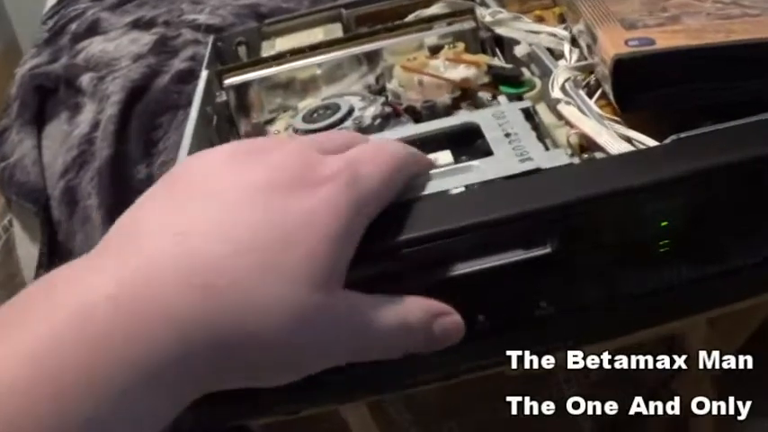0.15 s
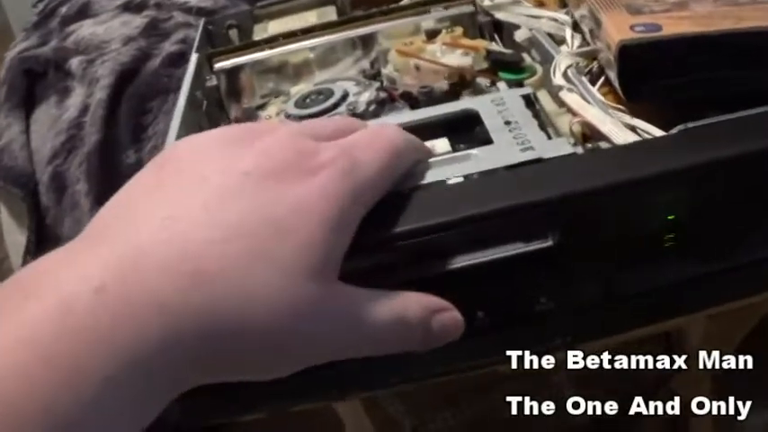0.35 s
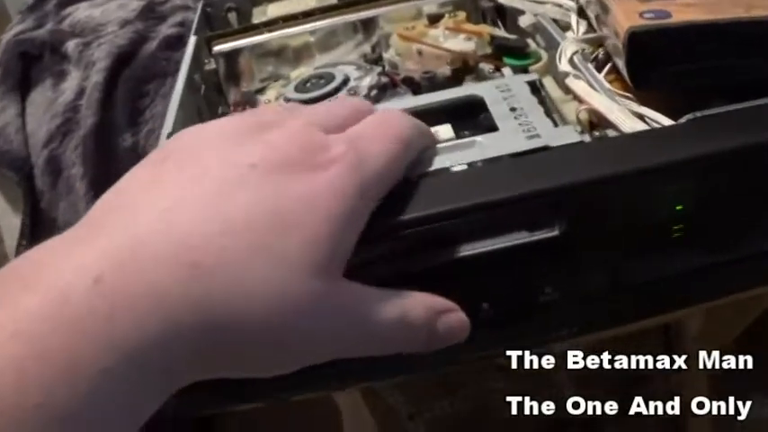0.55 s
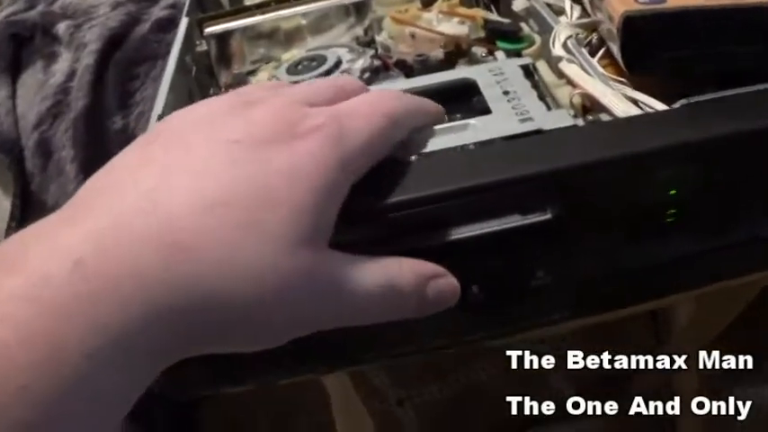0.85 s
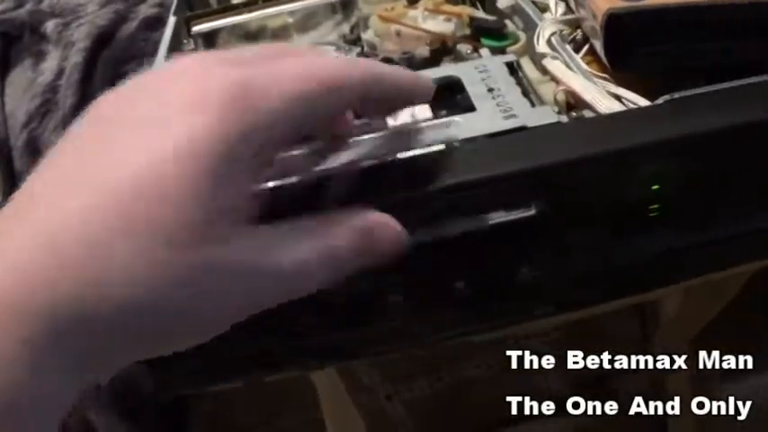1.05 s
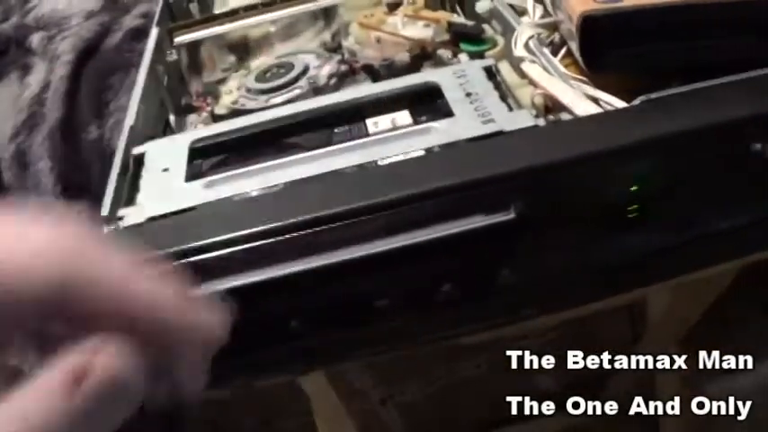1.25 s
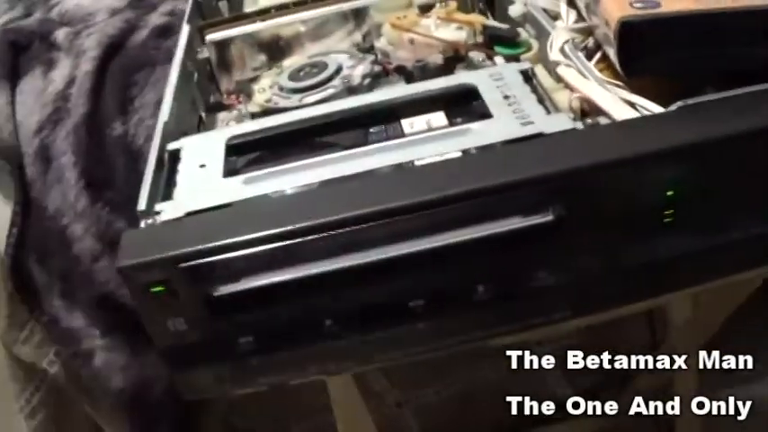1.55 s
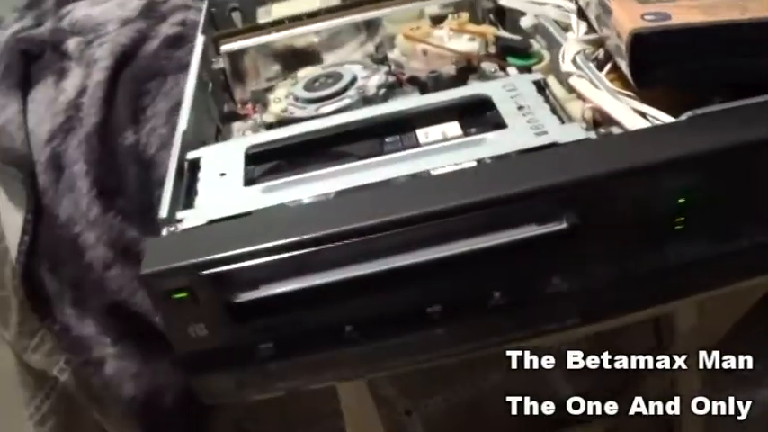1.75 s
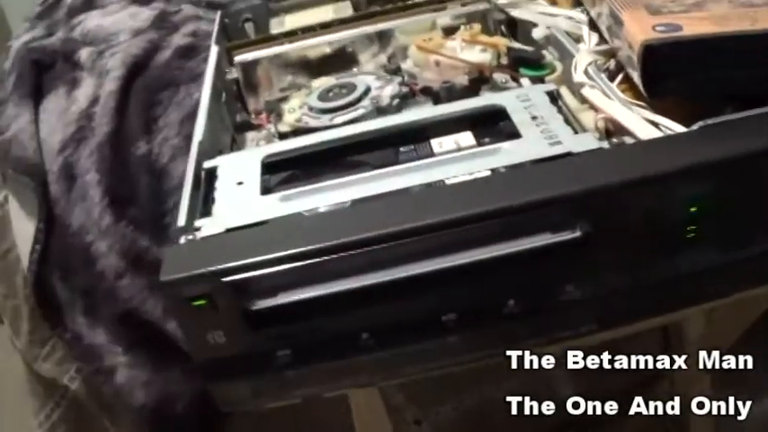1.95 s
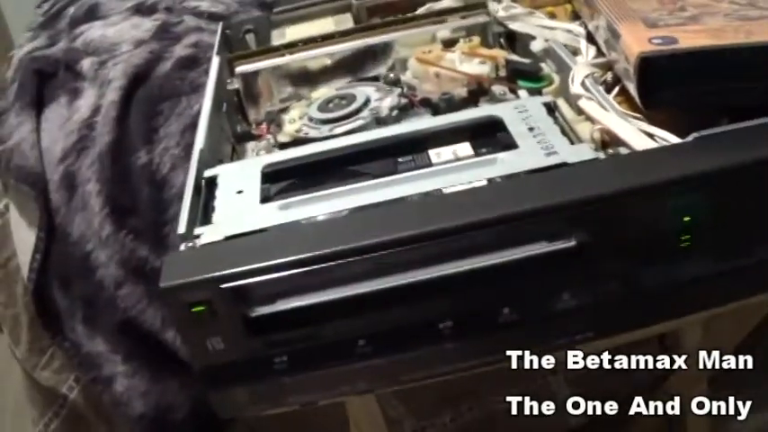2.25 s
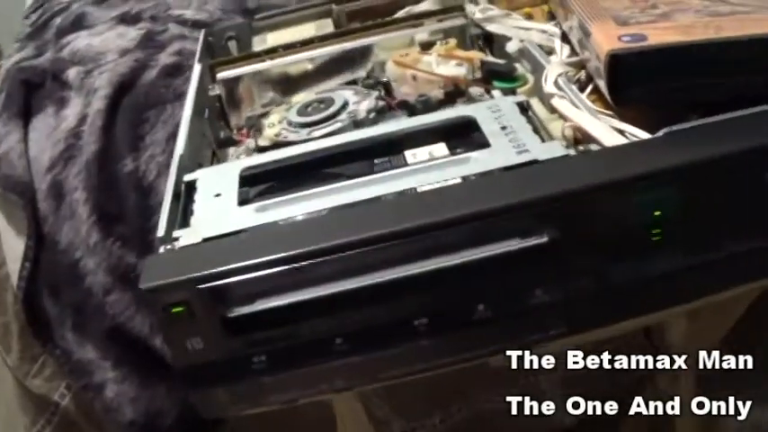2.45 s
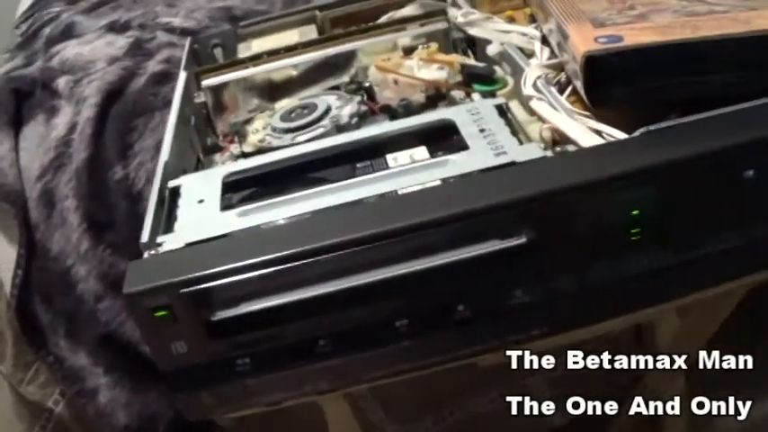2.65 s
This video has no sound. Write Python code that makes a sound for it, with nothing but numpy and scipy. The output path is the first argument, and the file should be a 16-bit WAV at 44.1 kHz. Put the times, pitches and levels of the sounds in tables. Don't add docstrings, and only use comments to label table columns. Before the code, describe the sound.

A tape deck's loading motor whirs, heard close in a small room. Light clicks and tray knocks at 0.2 s start a gritty, bright chirping run with a thin whine; a click lands at 0.82. It stops at 1.3 with loud clacks and rattle. A second, rougher run lasts from 1.5 to 2.49, ending in sharp clicks. A last tick at 2.68, faint rustle, steady low hum and hiss.

```python
import sys
import numpy as np
from scipy import signal
from scipy.fft import rfft, irfft, next_fast_len
from scipy.io import wavfile
from scipy.ndimage import uniform_filter1d

SR = 44100
rng = np.random.default_rng(int(sys.argv[2]) if len(sys.argv) > 2 else 0)


def invert_db(level):
    return 10 ** (np.asarray(level, dtype=float) / 20)


def dump(signal):
    limited = np.clip(np.atleast_2d(signal).T, -1, 1)
    pcm = np.round(limited * 32767).astype(np.int16)
    wavfile.write(sys.argv[1], SR, pcm)


N = 123479
T = np.arange(N) / SR


def noise(n=N):
    return rng.standard_normal(n)


def evened(x):
    return x / np.sqrt(np.mean(x ** 2) + 1e-20)


def wander(size):
    return evened(uniform_filter1d(uniform_filter1d(noise(), size=size), size=size))


def coloured(x, points):
    f, db = np.transpose(points)
    size = next_fast_len(N + 4096)
    hz = np.fft.rfftfreq(size, 1 / SR)
    gain = invert_db(np.interp(np.log(hz + 1), np.log(f + 1), db))
    return irfft(rfft(x, size) * gain, size)[..., :N]


def resonate(x, hz, width):
    turn = np.exp(2j * np.pi * np.cumsum(hz * np.ones(len(x))) / SR)
    r = np.exp(-np.pi * width / SR)
    return 2 * (turn * signal.lfilter([1 - r], [1, -r], x / turn + 1e-18)).real


def resonate_twice(x, hz, width):
    return resonate(resonate(x, hz, width), hz, width)


def through(x, peaks, patch_db=0):
    knots = np.arange(0, T[-1] + .5, .02)
    drift = uniform_filter1d(rng.standard_normal((len(knots), len(peaks))), size=50 // 14, axis=0)
    out = np.zeros(N)
    for k, (hz, width, db) in enumerate(peaks):
        level_db = db + np.interp(T, knots, patch_db * evened(drift[:, k]))
        out += (-1) ** k * invert_db(level_db) * resonate_twice(x, hz, width * 1.14)
    return evened(out)


def grains(per_s, spread_db):
    struck = rng.random(N) < per_s / SR
    size = invert_db(spread_db * np.minimum(rng.exponential(1, N), 4))
    return evened(struck * rng.choice([-1., 1.], N) * size)


def fading(rows):
    return sum((T >= s) * invert_db(db - 60 * np.maximum(T - s, 0) / t60) for s, db, t60 in rows)


def placed(rows, make):
    out = np.zeros(N)
    for s, *settings in rows:
        sound = make(*settings)
        part = out[round(s * SR):][:len(sound)]
        part += sound[:len(part)]
    return out


def background(lead=0):
    # f/Hz, level/dB, width [Hz]
    hum_tones = [(135.5, -57, 1.4), (97.5, -67, 3.1)]
    # f/Hz, level/dB per Hz
    hiss_colour = [(12, -44), (20, -22.5), (151, -10), (182, -14), (724, -17), (2150, -24.5), (8140, -30),
                   (10600, -34), (11500, -77), (15000, -85), (22000, -120)]
    out = invert_db(-52) * evened(coloured(noise(), hiss_colour))
    for hz, db, width in hum_tones:
        steady = 1.33 * np.sqrt(2) * np.sin(2 * np.pi * hz * T + lead)
        blurred = 0.21 * evened(resonate(noise(), hz, width))
        out += invert_db(db) * (steady + blurred)
    return out


def airy_tails():
    # t/s, level/dB, t60 [s]
    tail_rows = [
        (0, -50.5, 0.36),
        (2.56, -41, 1),
    ]
    return fading(tail_rows) * evened(np.diff(noise(N + 1)))


def loose_parts():
    # t/s, level/dB, t60 [s]
    rattles = [
        (0, -47.5, 0.57),
        (.2, -29, 0.26),
        (1.3, -21, 0.31),
        (2.48, -29.5, 0.38),
    ]
    # f/Hz, level/dB per Hz
    chatter_colour = [(120, -32), (200, -22), (582, -17.5), (920, -7), (4680, -16.5), (8770, -15),
                      (10900, -18.5), (11500, -42), (15000, -62), (22000, -120)]
    return fading(rattles) * evened(coloured(noise() + .5 * grains(1200, 5.2), chatter_colour))


def scuff(length, db, hz, width):
    t = np.arange(0, length, 1 / SR)
    return invert_db(db) * np.sin(np.pi * t / length) * evened(resonate_twice(noise(len(t)), hz, width))


def levers():
    # t/s, length [s], level/dB, f/Hz, width [Hz]
    scuffs = [
        (2.34, 0.06, -35, 2700, 2600),
        (1.72, 0.18, -45.5, 1950, 130),
        (2.17, .09, -43, 2020, 230),
    ]
    return placed(scuffs, scuff)


def knock(db, centre_hz, ring):
    # f/Hz, t60 [s]
    tray_modes = [(320, 0.11), (449, 0.088), (503, 0.16), (560, 0.22), (611, 0.075), (665, 0.036),
                  (720, 0.13), (770, 0.16), (828, 0.078), (945, 0.114), (1000, .05), (1250, 0.12)]
    t = np.arange(9000) / SR
    sound = np.zeros(len(t))
    for hz, t60 in tray_modes:
        near = np.exp(-.5 * (np.log2(hz / centre_hz) / 0.36) ** 2)
        decay = invert_db(2 * rng.standard_normal() - 60 * t / (t60 * ring))
        sound += near * decay * np.sin(2 * np.pi * hz * t + .4 * rng.standard_normal())
    return invert_db(db - 2.0) * sound * np.minimum(t / 0.0033, 1)


def tray():
    # t/s, level/dB, centre f/Hz, ring scale [1]
    knocks = [
        (.031, -35.5, 523, 0.39),
        (.207, -30, 486, 0.77),
        (.234, -33, 520, 1.1),
        (.284, -31.5, 800, 1.2),
        (.875, -32.5, 740, 0.5),
        (1.305, -28.5, 304, 1.3),
        (1.325, -37.5, 810, 0.35),
        (1.57, -30.5, 325, 0.65),
        (2.5, -35.5, 700, 1.07),
        (2.51, -37, 324, 0.88),
    ]
    return placed(knocks, knock)


def click(db, centre_hz, spread, ring):
    # f/Hz, t60 [s]
    latch_modes = [(1230, 0.062), (1790, 0.03), (2290, 0.04), (3000, 0.019), (3480, 0.0094), (4000, 0.031),
                   (4780, 0.027), (6000, 0.023), (7200, 0.0057), (8240, 0.027), (8750, 0.01), (9300, 0.026),
                   (10200, 0.015)]
    t = np.arange(3500) / SR
    crack = noise(len(t)) * np.exp(-t / (.004 * ring / 2))
    sound = np.zeros(len(t))
    for hz, t60 in latch_modes:
        near = np.exp(-.5 * (np.log2(hz / centre_hz) / max(spread, .1)) ** 2)
        decay = invert_db(2.5 * rng.standard_normal() - 60 * t / (t60 * ring))
        mode = decay * np.sin(2 * np.pi * hz * (1 + 0.04 * rng.standard_normal()) * t)
        sound += near * (mode + invert_db(7) * 3 * resonate_twice(crack, hz, 0.17 * hz))
    sound *= np.minimum(t / 0.0015, 1)
    return invert_db(db) * sound / np.sqrt(np.mean(sound[:200] ** 2))


def latches():
    # t/s, level/dB, centre f/Hz, spread [octaves], ring scale [1]
    clicks = [(0.0545, -35, 7400, 0.1, 0.8), (.073, -43, 4400, 0.21, 0.46), (.073, -47, 8800, 0.2, 0.55),
              (0.2, -25.5, 8500, 1.3, 3.2), (0.229, -29.5, 3700, 1.2, 1.9), (0.285, -36, 7550, 0.18, 1.1),
              (.821, -25, 3500, 0.59, 0.6), (.8205, -20, 10000, 0.18, 2.1), (1.266, -17, 5500, 1.5, 1.3),
              (1.295, -15.5, 3670, 2.8, 0.55), (1.527, -31, 7300, 0.092, 0.55),
              (1.574, -29, 4000, 0.91, 0.77), (2.414, -30.5, 2100, 0.48, 2.3),
              (2.427, -21.5, 6300, 1.1, 1.1), (2.473, -24.5, 8000, 0.1, 1.8),
              (2.4795, -18.5, 4890, 1.6, 0.25), (2.5, -31.5, 3300, 0.56, 0.98),
              (2.530, -30, 4400, 0.75, 0.96), (2.679, -40, 3520, 0.36, 0.34)]
    return placed(clicks, click)


def ping(hz, db, t60):
    t = np.arange(12000) / SR
    return invert_db(db - 60 * t / t60) * np.sin(2 * np.pi * hz * t) * np.minimum(t / 0.00054, 1)


def struck_tones():
    # t/s, f/Hz, level/dB, t60 [s]
    pings = [(.8215, 1810, -22, .04), (.821, 2430, -24, .035), (.821, 5900, -25, .02),
             (1.2675, 1970, -23, .03), (1.267, 5000, -22, .02), (1.301, 3700, -34, .3),
             (1.298, 5890, -19, .03), (1.2985, 9700, -17, .015), (2.4795, 2190, -26, .035),
             (2.678, 1115, -33, .025), (2.678, 2940, -32, .02), (.2075, 490, -19, .03),
             (.2075, 612, -23, .12), (.207, 960, -29, .04), (.2335, 740, -23, .045), (.2835, 775, -21, .04),
             (.875, 520, -29, .04)]
    return placed(pings, ping)


def gear_grind():
    # f/Hz, width [Hz], level/dB
    frame = [(360, 234, -6.5), (530, 117, -9.5), (728.3, 52, -2), (837, 176, -7), (1082, 336, 1.5),
             (1390, 210, -3.5), (2100, 450, -5.5), (3377, 660, -5), (4544, 460, -6)]
    # f/Hz, level/dB per Hz
    grind_colour = [(88, -48), (150, -19.5), (641, -14), (1130, -10), (5360, -10), (7300, -2.5),
                    (10100, -5.5), (11500, -25), (15000, -59), (22000, -120)]
    teeth = noise() + 0.83 * grains(2500, 2.65)
    spray = evened(coloured(teeth[::-1], grind_colour))
    return invert_db(-8.5) * through(teeth, frame, patch_db=3) + invert_db(-5.5) * spray


def whine(rows, width, multiple, partner_db, clean):
    s, hz, db = np.transpose(rows)
    pitch = uniform_filter1d(np.interp(T, s, hz), size=1500) * (1 + .002 * wander(1200))

    def tone(k, p):
        pure = np.sqrt(2) * np.sin(2 * np.pi * k * np.cumsum(p) / SR)
        blurred = evened(resonate(noise(), k * p, width * k))
        return clean * pure + (1 - clean) * blurred

    level_db = np.interp(T, s, db)
    partner_level = invert_db(partner_db + uniform_filter1d(level_db, size=9000))
    partner = tone(multiple, uniform_filter1d(pitch, size=6000))
    return invert_db(level_db) * tone(1, pitch) + partner_level * partner


def snap(db, hz):
    t = np.arange(900) / SR
    shape = np.minimum(t / .001, 1) * invert_db(db + 2.5 - 60 * t / 0.011)
    fuzz = evened(resonate(noise(len(t)), hz, 2200))
    return shape * (np.sin(2 * np.pi * hz * t) + 0.29 * fuzz)


def brush_snaps():
    # t/s, peak level/dB, f/Hz
    snaps = [(0.5485, -14, 7100), (0.6, -17, 7170), (0.6504, -15.5, 7100), (0.6744, -20, 8330),
             (0.7014, -11, 7400), (0.728, -16, 7230), (0.7532, -14, 7240), (0.8586, -14, 7200),
             (0.9123, -13, 8400), (0.9363, -16, 7240), (0.987, -16, 7350), (1.0167, -12, 7260),
             (1.0954, -21, 7000), (1.1237, -14, 7140), (1.1483, -15, 7400), (1.1984, -20, 7400),
             (1.5202, -25, 7400), (1.6197, -25, 8200), (1.6751, -21, 8260), (1.7, -10, 8300),
             (1.7549, -19, 8600), (1.7893, -22, 7460), (1.8468, -26, 8200), (1.8731, -21, 8250),
             (1.932, -21, 8100), (1.9642, -15, 8000), (1.99, -20, 8080), (1.995, -15, 8700),
             (2.0464, -12, 8200), (2.0528, -19, 7500), (2.0758, -16, 8180), (2.1335, -20.5, 7190),
             (2.162, -13, 7080), (2.2453, -22, 7360), (2.2688, -11.5, 8560), (2.3813, -13, 8800),
             (2.3874, -17, 7150), (2.4455, -25, 6700)]
    return placed(snaps, snap)


def brush_contact(turns):
    step = turns * 6 + .5 + .22 * wander(300)
    strength = invert_db(rng.standard_normal(600))[(step + 10).astype(int)]
    chirp = strength * np.sin(np.pi * (step % 1)) ** (2 * 0.84)
    return 0.43 * noise() + evened(chirp) * (0.65 * noise() + 0.35 * grains(190, -7))


def motor():
    # t/s, angle [turns]
    angle = [(.26, -.85), (.345, 2), (.488, 7.58), (.739, 17.3), (.989, 26.88), (1.24, 36.42), (1.4, 42),
             (1.5, 45), (1.6, 48.3), (1.843, 56.75), (2.086, 65.22), (2.329, 73.85), (2.6, 83.3)]
    # on t/s, off t/s, spin-up [s], level/dB, once-a-turn swell [dB]
    runs = [
        (0.238, 1.3, 0.081, -29.5, 3),
        (1.501, 2.489, 0.031, -28.5, 3.5),
    ]
    # t/s, f/Hz, level/dB
    mesh = [
        [(.3, 1040, -58), (.34, 1080, -45), (.4, 1130, -52), (.55, 1165, -47), (.7, 1147, -38), (.8, 1165, -44),
         (.9, 1138, -42), (1, 1146, -40), (1.1, 1126, -43), (1.17, 1152, -40), (1.27, 1105, -41)],
        [(1.52, 740, -50), (1.57, 950, -43), (1.64, 1085, -43), (1.72, 1065, -43), (1.81, 1010, -50),
         (1.855, 996, -34), (1.89, 994, -33), (1.93, 1000, -50), (2.08, 1065, -42), (2.22, 1070, -44),
         (2.3, 1040, -49), (2.38, 1030, -43), (2.45, 985, -36)],
    ]
    # width [Hz], second line's multiple [1], second line level/dB, clean share [1]
    mesh_shape = [
        (16, .803, -3.5, 0.85),
        (50, 2.0, -9, 0.6),
    ]
    # f/Hz, width [Hz], level/dB
    can = [(7170, 360, 4.5), (8354, 920, 1), (9060, 160, -5), (9850, 230, -7), (11010, 620, -14),
           (5530, 93, -17)]
    turns = np.interp(T, *np.transpose(angle)) + 0.088
    contact = brush_contact(turns)
    gears = gear_grind()
    out = np.zeros(N)
    for (on, off, spin, db, swell_db), rows, shape in zip(runs, mesh, mesh_shape):
        spin_up = 1 - np.exp(-np.maximum(T - on, 0) / spin)
        running = spin_up * np.clip((off - T) / 0.0062, 0, 1)
        swell = invert_db(swell_db * (np.cos(2 * np.pi * turns) + 0.45 * np.cos(4 * np.pi * turns)))
        brushes = running * through(contact * swell, can)
        out += invert_db(db) * (brushes + running ** 1.04 * gears)
        out += np.minimum(8 * running, 1) * whine(rows, *shape)
    return out


def room(x, points):
    hz, t, z = signal.stft(noise(SR // 2), SR, nperseg=256)
    f, t60 = np.transpose(points)
    decay = invert_db(-60 * t / np.interp(hz, f, t60)[:, None])
    tail = signal.istft(z * decay, SR, nperseg=256)[1]
    return signal.fftconvolve(x, tail / np.linalg.norm(tail))[:N]


def scene():
    # f/Hz, t60 [s]
    echo = [(200, 0.53), (1500, 0.22), (5000, 0.21), (10000, 0.08)]
    # f/Hz, level/dB
    side_colour = [(60, -97.5), (220, -9), (840, -6), (3120, -6.5), (11600, -19)]
    deck = loose_parts() + levers() + tray() + latches() + struck_tones() + brush_snaps() + motor() + airy_tails()
    mid = deck + invert_db(-14) * room(deck, echo) + background()
    near_echo = room(deck, [(200, 0.03), (10000, 0.28)])
    side = coloured(near_echo + invert_db(-14) * room(deck, echo), side_colour)
    side += invert_db(-14) * background(lead=np.pi / 2)
    return np.array([mid + side, mid - side])


def top_cut(x):
    return signal.sosfilt(signal.butter(12, 12240, fs=SR, output="sos"), x)


def record(dry):
    ceiling = .6
    limited = ceiling * np.tanh(dry / ceiling)
    steep, wide = [signal.firwin(601, hz, window=("kaiser", 9), fs=SR) for hz in (11060, 12300)]
    taps = steep + invert_db(-23) * (wide - steep)
    mix = signal.oaconvolve(limited, taps[None], "same")
    return top_cut(mix)


dry = scene()
out = record(dry)
dump(out)
```